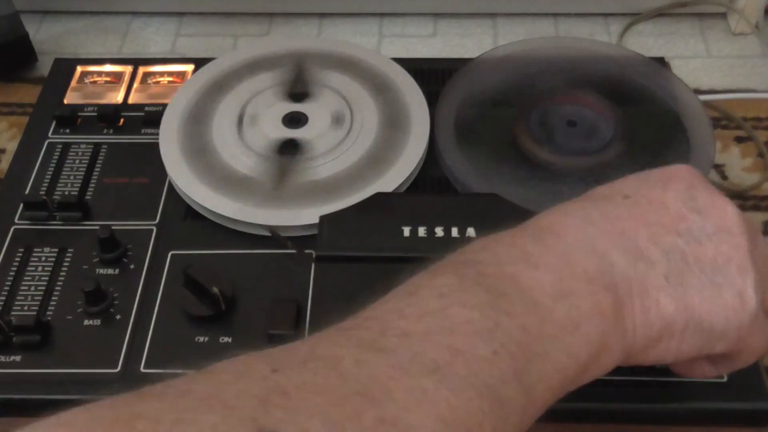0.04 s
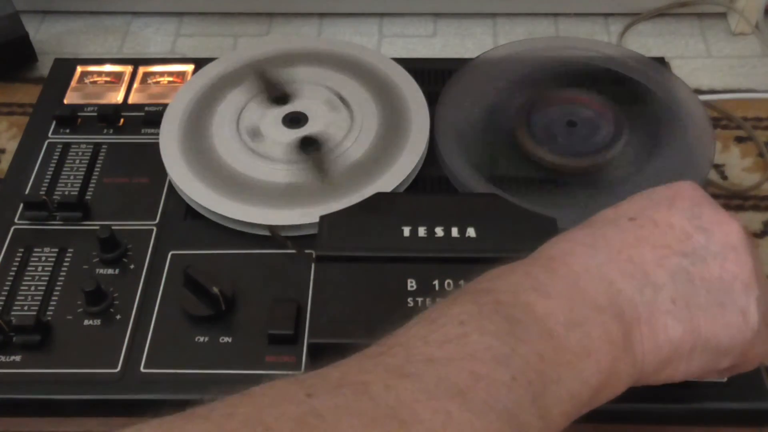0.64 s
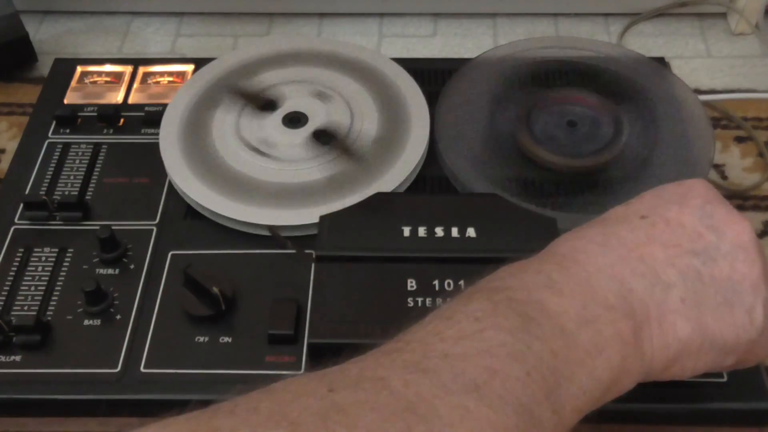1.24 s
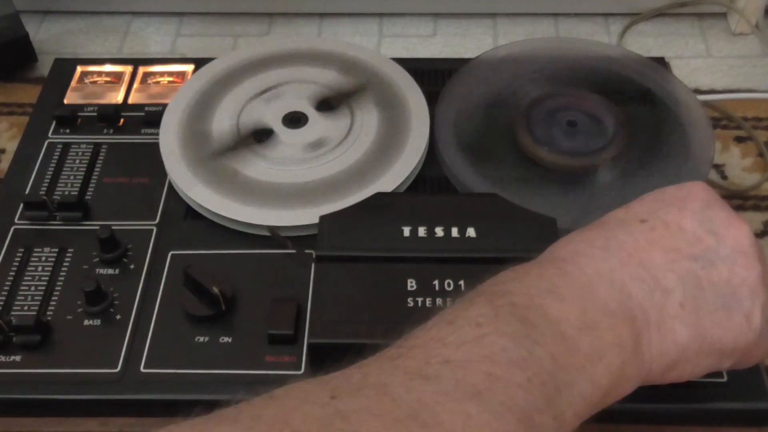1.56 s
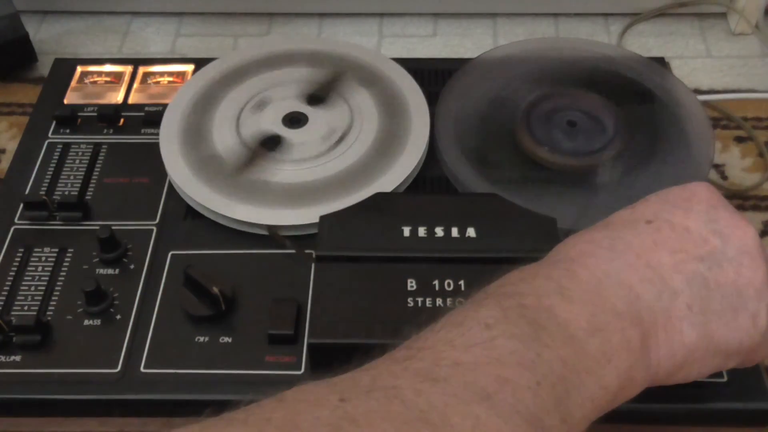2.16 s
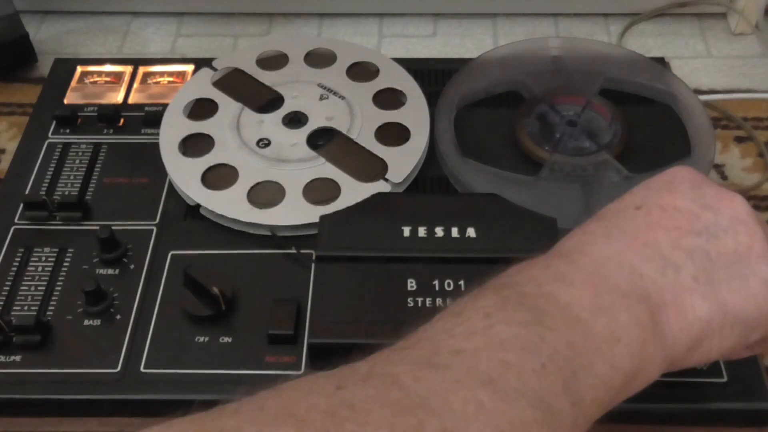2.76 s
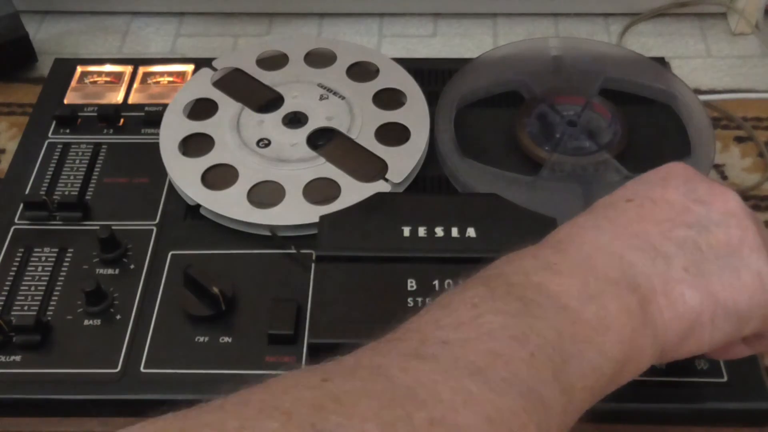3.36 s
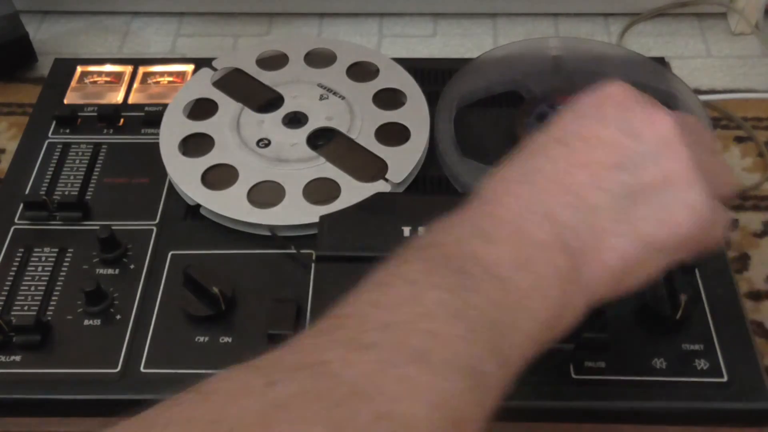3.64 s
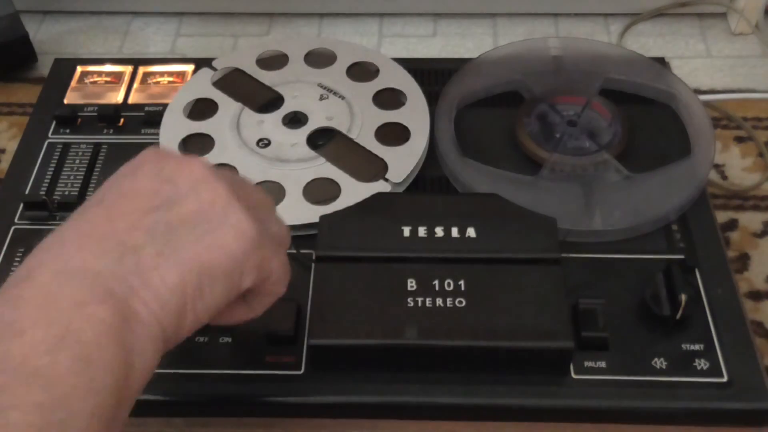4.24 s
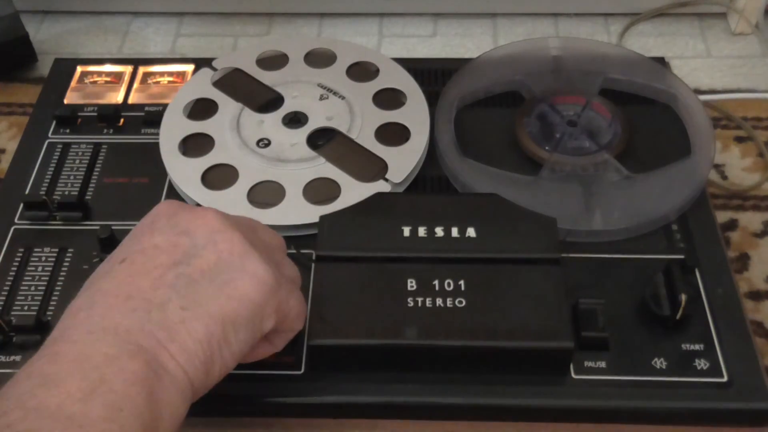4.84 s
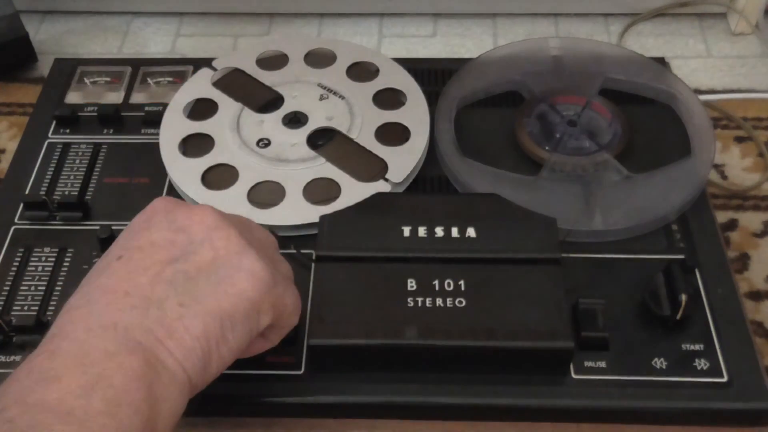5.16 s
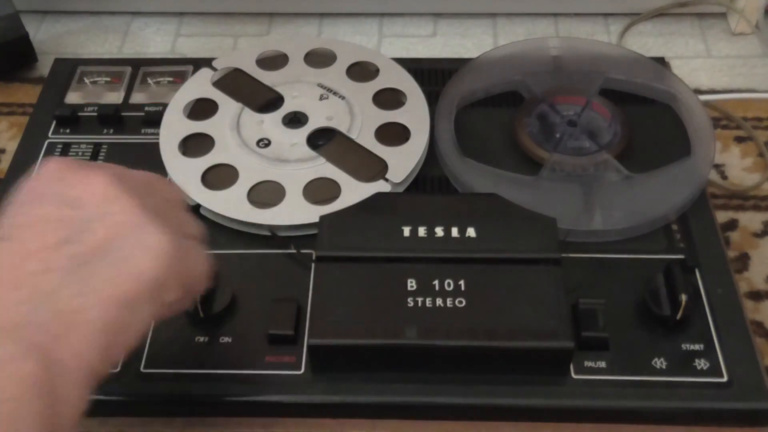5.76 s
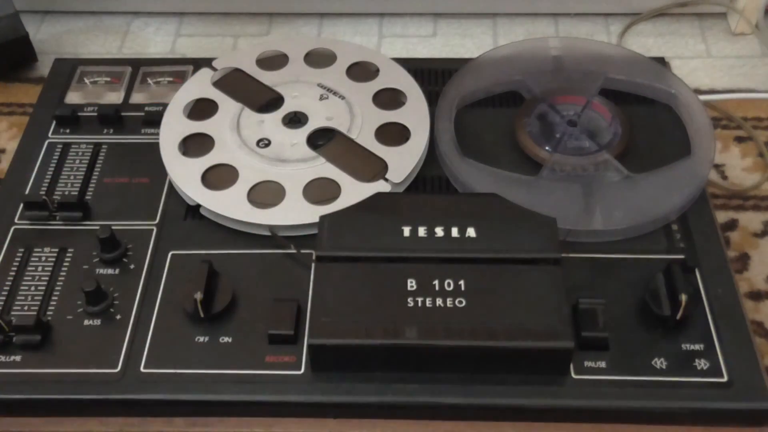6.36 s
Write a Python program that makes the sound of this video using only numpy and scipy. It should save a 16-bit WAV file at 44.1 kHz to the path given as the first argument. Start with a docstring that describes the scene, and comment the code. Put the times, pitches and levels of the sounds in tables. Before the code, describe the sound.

A reel-to-reel tape recorder winds fast with a whirr and ticks, clunks to a stop, idles, then switches off with a ringing clack.

```python
"""A reel-to-reel tape deck winds fast in a small room: the drive whirrs and the tape brushes a reel
flange on every turn. The transport knob snaps to stop, the case rings and the brakes grab. The motor
idles, its belt joint ticking once a lap, while a sleeve rustles and fingers rock the mains switch.
The switch clacks off, its spring rings on and the motor coasts down."""
import sys
import numpy as np
from scipy import signal
from scipy.fft import rfft, irfft, next_fast_len
from scipy.io import wavfile
from scipy.ndimage import uniform_filter1d, map_coordinates

SR = 44100
rng = np.random.default_rng(int(sys.argv[2]) if len(sys.argv) > 2 else 0)


def transcribe(signal):
    """Save signal, clipped to [-1, 1], as a 16-bit WAV file at the path in sys.argv[1]."""
    frames = np.atleast_2d(signal).T
    limited = np.clip(frames, -1, 1)
    pcm = np.round(limited * 32767).astype(np.int16)
    wavfile.write(sys.argv[1], SR, pcm)


N = 286650

STOP_S, OFF_S = 2.362, 4.983  # the transport stops; the power goes
LOADED_LAPS_PER_S, FREE_LAPS_PER_S, SHAFT_TURNS_PER_LAP = 2.9346, 3.21, 7.34

# Tone colours of the steady and rubbing noises. Each row: frequency in Hz, relative level in dB.
DRIVE_WHIRR = [(47, -42), (80, -15.5), (102, -8.5), (151, -12.5), (179, -6.5), (247, -4), (331, -9.5),
               (479, 1), (586, -1), (705, -8), (975, -5), (1170, -6), (2140, -9), (2830, -22.5),
               (3200, -12), (4160, -32.5), (7040, -120)]
TAPE_HISS = [(1500, -33), (3000, -10.5), (3600, -4), (5000, 0), (6200, 2), (7500, -1), (10000, -3),
             (12500, -7), (14500, 1.5), (15800, -4)]
FLANGE_SQUEAK = [(3000, -46), (5000, -14.5), (6200, 5.5), (7600, -15.5), (9000, -4.5), (10200, 4.5),
                 (12000, -11), (13500, -7.5), (15800, -5.5)]
MOTOR_RUMBLE = [(41, -40.5), (70, -17), (101, -3), (268, -2.5), (313, -15), (505, 3), (562, -8.5), (656, 3),
                (720, -13.5), (790, -1), (853, -19.5), (1030, -14.5), (1790, -18.5), (1930, -17.5),
                (2800, -27), (3640, -55.5), (6160, -120)]
BEARING_HISS = [(2500, -19.5), (3600, -6), (4700, 1.5), (5300, -3), (5800, -1), (6800, -13), (9000, -6.5),
                (11000, -20), (15800, -16.5)]
ROOM_TONE = [(15, -52.5), (25, -23.5), (107, -2.5), (174, -6), (269, -2), (333, -3.5), (500, -2),
             (1120, -8), (1730, -11), (2730, -19), (3880, -20), (4820, -16.5), (6310, -22), (13400, -24.5),
             (15800, -28)]
BRAKE_RUB = [(59, -55.5), (100, -27), (265, -3.5), (388, -16), (479, 1.5), (522, -3.5), (868, -4.5),
             (1140, -13.5), (1380, -9.5), (2900, -26.5), (4930, -25), (14500, -36), (15800, -38)]
CLOTH_RUSTLE = [(500, 1), (2000, 2), (3000, -6), (5500, 3), (8000, -2.5), (10000, -12), (15800, -26)]
# Tone colours of the hits. Each row: frequency in Hz, relative level in dB.
SLAP_EDGE = [(500, -12), (1000, -4), (1300, -2), (1850, -5), (2600, -20), (8000, -37)]
SOFT_KNOCK = [(100, -31), (250, 0), (500, 3.5), (750, 1.5), (950, -9.5), (1400, -17), (2800, -35)]
STOP_CRACK = [(400, -5), (1000, -10), (1800, -2.5), (3000, -11.5), (4000, -4.5), (4900, -1), (6200, -5),
              (7200, -2), (10000, -6.5), (12000, -10.5), (14500, -9), (15800, -18)]
CHASSIS_THUD = [(50, -31.5), (150, -19), (245, 3.5), (400, 1.5), (800, -5), (1800, -9), (2800, -14),
                (9000, -40.5)]
SWITCH_CRACK = [(400, -7), (1200, -0.5), (2200, -3.5), (3100, -14.5), (4000, -6), (6000, -5), (8000, -5),
                (9500, -2.5), (11500, -17.5), (13000, -7.5), (15800, -21)]
# Resonances the running parts keep excited. Each row: centre in Hz, width in Hz, relative level in dB.
WINDING_PEAKS = [(172, 60, -8), (265, 38, -4), (502, 54, -6), (595, 28, 3), (645, 12, -0.5), (1057, 34, -8),
                 (2185, 37, -8)]
IDLE_PEAKS = [(255, 12, 0.5), (500, 26, 4), (639, 44, -6), (801, 21, 2), (1063, 30, -13.5), (1215, 23, -13)]
BEARING_PEAKS = [(4550, 350, 0), (5000, 350, -1), (5750, 300, -4)]
# Tape hiss over one reel turn. Each row: share of the turn since the brush, level change in dB.
HISS_OVER_TURN = [(0, 1.5), (.15, 0.5), (.36, -3), (.42, 6.5), (.55, -0.5), (.62, 2.5), (.78, -2.5),
                  (1, 0.5)]
# How hard the tape presses on the flange. Each row: time in seconds, level in dB.
FLANGE_PRESSURE = [(.09, -39), (.58, -32.3), (.85, -34.6), (1.4, -33.6), (1.85, -33.6), (2.31, -36.5)]
# Parts that ring when struck. Each row: pitch in Hz, relative level in dB, 60 dB decay in seconds.
TAUT_BELT_MODES, SLACK_BELT_MODES = [(845, -2, .06)], [(1220, -8, .06)]
FEET_MODES = [(55, -50, .06), (115, -42, .05)]
SWITCH_KNOB_MODES = [(430, -11, .06), (561.5, 0, .05), (773, -5.5, 0.056)]
SWITCH_LEVER_MODES = [(5900, -8.5, .015), (9400, -4.5, .025)]
SWITCH_SPRING_MODES = [(441, -49.5, 1.2), (1066, -56, .9), (2762, -59.5, 1.35), (3348, -65, 1),
                       (3946, -59, .95), (4500, -57, .85), (4667, -54.5, .95)]
# The ring of the case. Each row: pitch in Hz, 60 dB decay in seconds, relative level in dB when hit
# by the transport knob, and when hit by the mains switch.
CASE_MODES = [(242.7, 0.2, -26, -31.5), (355, 0.26, -27, -39.5), (425, .2, -37, -34),
              (471, 0.2, -23, -27.5), (484, 0.23, -31, -38.5), (560, .2, -30, -28.5),
              (598, 0.19, -33, -26.5), (668, 0.23, -31, -31), (745, 0.15, -23.5, -32),
              (789, 0.13, -21.5, -30.5), (847, .2, -25.5, -38.5), (1055, 0.2, -38, -29),
              (1123, .2, -35, -37), (1170, 0.056, -40, -15.5), (1188, 0.19, -33, -27),
              (1246, 0.15, -28.5, -32), (1417, 0.09, -23, -26), (1715, 0.17, -31, -43),
              (1798, 0.15, -29.5, -32), (2131, 0.07, -34, -19.5), (2680, 0.053, -55, -26.5)]
# Hits inside the controls. Each row: start in seconds, relative crack and knock levels in dB.
STOP_CONTACTS = [(2.36, -21, -20), (2.436, -39, -28), (2.453, -46, -31), (2.502, -40.5, -27)]  # the detent lets go, then the brake levers land
SWITCH_CONTACTS = [(4.9745, -20, -31), (4.978, -18.5, -30), (4.9818, -4.5, -16.5), (4.9843, -9, -27),
                   (4.992, -21.5, -21)]
# Strokes of the sleeve. Each row: start and end in seconds, level in dB, rise and fall in seconds.
SLEEVE_STROKES = [(4.125, 4.145, -54, .018, .022), (6.24, 6.5, -63.6, .04, .05)]
# Fingers rocking the mains switch. Each row: start in seconds, relative knock and ping levels in dB.
FINGER_TOUCHES = [(4.5564, -38.5, -57), (4.573, -46, -55), (4.5845, -39.5, -48), (4.592, -43, -45),
                  (4.627, -47, -68), (4.818, -35.5, -56), (4.827, -44, -66), (4.9283, -42, -67),
                  (4.961, -43, -63), (4.975, -40, -24)]
# Stereo image of the deck and of the room tone. Each row: frequency in Hz, left-right correlation.
DECK_IMAGE = [(100, 0.45), (250, 0.92), (550, 0.91), (1000, 0.81), (2000, 0.99), (6000, 0.78), (10000, 0.6),
              (15000, 0.52)]
ROOM_IMAGE = [(60, .05), (180, -0.22), (1000, -0.36), (2000, 0.13), (5000, .2), (15000, 0.22)]
# The room's tail. Each row: frequency in Hz, 60 dB decay in seconds.
ROOM_DECAY = [(150, 0.6), (500, 0.22), (2000, 0.25), (7000, 0.23), (10000, 0.17), (14000, 0.13)]


def amp(db):
    """Decibels to gain."""
    return 10 ** (np.asarray(db) / 20)


def clock():
    """Time of every sample in seconds."""
    return np.arange(N) / SR


def along(points, hz):
    """Read a curve of (Hz, value) points on a log frequency axis."""
    knots, values = np.transpose(points)
    return np.interp(np.log(hz + 1), np.log(knots + 1), values)


def wobble(rate):
    """A smooth random curve, rate knots a second."""
    return map_coordinates(rng.standard_normal(int(N * rate / SR) + 4), [clock() * rate])


def swell(start, end, db, rise, fall):
    """An envelope that grows up to start, holds until end and dies away; times in seconds."""
    t = clock()
    return amp(db) * np.exp(np.minimum(t - start, 0) / rise - np.maximum(t - end, 0) / fall)


def filtered(x, response):
    """EQ a sound with a gain given as a function of frequency."""
    size = x.shape[-1]
    padded = next_fast_len(size + 8192)
    return irfft(rfft(x, padded) * response(np.fft.rfftfreq(padded, 1 / SR)), padded)[..., :size]


def colour(spectrum):
    """EQ curve of a tone colour, rolling off below its first point."""
    return lambda hz: amp(along(spectrum, hz)) * np.minimum(hz / spectrum[0][0], 1) ** 2


def resonances(peaks):
    """EQ curve of a few damped resonances."""
    return lambda hz: sum((-1) ** k * amp(db) * 1j * hz * width / (centre**2 - hz**2 + 1j * hz * width)
                          for k, (centre, width, db) in enumerate(peaks))


def noise(response, image=DECK_IMAGE, size=N):
    """Coloured stereo noise of rms 1, partly alike in both ears."""
    def mid_side(hz):
        angle = np.arccos(np.clip(along(image, hz), -1, 1)) / 2
        return response(hz) * np.array([np.cos(angle), np.sin(angle)])
    mid, side = filtered(rng.standard_normal((2, size)), mid_side)
    stereo = np.array([mid + side, mid - side])
    return stereo / np.sqrt(np.mean(stereo ** 2) + 1e-20)


def add(track, s, sound):
    """Mix a sound into the track at s seconds."""
    part = track[:, round(s * SR):][:, :sound.shape[-1]]
    part += sound[..., :part.shape[1]]


def burst(spectrum, t60, attack, image=DECK_IMAGE):
    """A noisy hit: the contact stirs many close, quickly dying modes."""
    t = np.arange(SR // 4) / SR
    return noise(colour(spectrum), image, size=len(t)) * amp(-60 * t / t60) * (1 - np.exp(-t / attack))


def ring(modes, attack, size=SR // 2):
    """A pitched hit: separate modes, struck at slightly new strengths each time."""
    t = np.arange(size) / SR
    tones = sum((-1) ** k * amp(db + rng.normal() - 60 * t / t60) * np.sin(2 * np.pi * hz * t)
                for k, (hz, db, t60) in enumerate(modes))
    return tones * (1 - np.exp(-t / attack))


def winding():
    """The drive whirrs; the sliding tape hisses and brushes the flange on each reel turn."""
    t = clock()
    fade = np.clip(1 - (t - STOP_S) / 0.31, 0, 1)
    whirr = amp(-52.5) * noise(colour(DRIVE_WHIRR))
    whirr += amp(-56.5 + 1.9 * wobble(25)) * noise(resonances(WINDING_PEAKS))
    first_brush_s, turn_s, quicken_s = .0895, .2488, .0004  # each turn is a little shorter
    k = np.arange(-1, STOP_S / turn_s + 1)
    brush_times = first_brush_s + turn_s * k - quicken_s * k ** 2 / 2
    turns = np.interp(t, brush_times, k)
    turn_db = np.interp(turns % 1, *np.transpose(HISS_OVER_TURN))
    hiss = amp(-50 + turn_db + 1.15 * wobble(90)) * noise(colour(TAPE_HISS))
    # the edge presses in gradually, squeaks in the flange, then slips free with a broad rasp
    brushes = [(s, np.interp(s, *np.transpose(FLANGE_PRESSURE))) for s in brush_times if 0 < s < STOP_S]
    press = sum(amp(db) * np.exp(np.minimum((t - s) / .015, (s - t) / .005)) for s, db in brushes)
    slip = sum(amp(db) * np.exp(-((t - s) / .0055) ** 2) for s, db in brushes)
    squeak = press * amp(1 + 1.2 * wobble(350)) * noise(colour(FLANGE_SQUEAK))
    rasp = slip * amp(-3) * noise(colour([(5000, -13.5), (9000, -4.5), (15000, -1.5)]))
    lean_left = amp([[.7], [-.7]])
    return fade * (whirr * amp(0.89 * wobble(40)) + hiss) + (squeak + rasp) * lean_left


def belt_laps(spin_up_s=.325, coast_s=6.0):
    """Laps run by the belt: slow under load, faster when free, slowing once the power is off."""
    t = clock()
    rate = np.interp(t, [STOP_S, STOP_S + spin_up_s], [LOADED_LAPS_PER_S, FREE_LAPS_PER_S])
    rate *= np.exp(-np.maximum(t - OFF_S, 0) / coast_s)
    return np.cumsum(rate) / SR - .2587  # the joint starts this share of a lap before the pulley


def running_db(db, drop_db, fade_db_per_s):
    """Level of a motor part: steady under power, then a drop and a slow fade."""
    coasting_s = np.maximum(clock() - OFF_S, 0)
    return db - drop_db * (1 - np.exp(-coasting_s / .06)) - fade_db_per_s * coasting_s


def motor():
    """Rumble in the case, mains hum, and a bearing that hisses and rubs once per shaft turn."""
    t = clock()
    shaft_pulse = np.cos(2 * np.pi * SHAFT_TURNS_PER_LAP * belt_laps())
    shade_db = 2.4 * np.exp(-((t - 3.76) / .26) ** 2)  # an arm passes over the deck and shades it
    rumble = amp(-4.5) * noise(colour(MOTOR_RUMBLE)) + amp(-8.5) * noise(resonances(IDLE_PEAKS))
    rumble_db = running_db(-54.9, drop_db=3, fade_db_per_s=4) - .6 * shade_db + shaft_pulse
    hiss = amp(-3.3 + 2.5 * shaft_pulse) * noise(colour(BEARING_HISS))
    rub = amp(-10.5 + 7 * shaft_pulse) * noise(lambda hz: resonances(BEARING_PEAKS)(hz) ** 2)
    bearing_db = running_db(-62.8, drop_db=4, fade_db_per_s=12) - shade_db + 1.5 * wobble(60)
    power = np.clip((OFF_S - t) / .03, 0, 1)
    hum = amp(-71 + wobble(2.3)) * np.sin(2 * np.pi * 100 * t) * power
    return amp(rumble_db) * rumble + amp(bearing_db) * (hiss + rub) + hum


def room_tone():
    """The still air of the room: a soft, wide bed under everything."""
    return amp(-57) * noise(colour(ROOM_TONE), ROOM_IMAGE)


def belt():
    """Once a lap the joint slaps the pulley: a short ringing edge, then a soft knock in the case."""
    out = np.zeros((2, N))
    laps = belt_laps()
    for s in np.interp(np.arange(laps[-1]), laps, clock()):
        db = -41.6 - 1.3 * (s > OFF_S) + .4 * rng.normal()  # a little softer without power
        modes = TAUT_BELT_MODES if s < STOP_S else SLACK_BELT_MODES
        add(out, s - .004, amp(db - 9) * burst(SLAP_EDGE, t60=.059, attack=.0011))
        add(out, s - .002, amp(db) * ring(modes, attack=.002))
        add(out, s, amp(db - 7.5) * burst(SOFT_KNOCK, t60=.15, attack=.0013))
    return out


def chatter(s, crack_db, knock_db, count, first_gap_s=.0033, gap_growth=1.6):
    """Contact rows for a blow and the rebounds of its linkage, ever weaker and further apart."""
    k = np.arange(count)
    delays = np.cumsum(np.r_[0, first_gap_s * gap_growth ** k[:-1]])
    return list(zip(s + delays, crack_db - 4.2 * k, knock_db - 1.7 * k))


def clunk(contacts, crack, crack_t60, thud_db, wet_db):
    """A sprung control snaps over: each contact cracks, thuds into the chassis and stirs the room."""
    out = np.zeros((2, N))
    narrow = [(1000, 0.8), (5000, 1.0), (9000, 0.78)]
    for s, crack_db, knock_db in contacts:
        add(out, s, amp(crack_db + 4) * burst(crack, crack_t60, attack=.001, image=narrow))
        add(out, s, amp(knock_db + thud_db) * burst(CHASSIS_THUD, t60=.07, attack=.0017, image=narrow))
        add(out, s, amp(crack_db + wet_db) * room_tail(crack))
        add(out, s, amp(knock_db - 18) * room_tail(CHASSIS_THUD))
    return out


def room_tail(spectrum, width=0.46):
    """The walls' diffuse answer to a blow of this colour; the treble dies first."""
    correlation = (1 - width ** 2) / (1 + width ** 2)
    wash = noise(colour(spectrum), [(1000, correlation)], size=SR // 2)
    hz, t, bands = signal.stft(wash, SR, nperseg=256)
    decay = amp(-60 * t / along(ROOM_DECAY, hz)[:, None])
    return signal.istft(bands * decay * np.minimum(t / .008, 1), SR, nperseg=256)[1]


def controls():
    """The transport knob, then the mains switch, set the case ringing; the switch spring sings on."""
    knob_hits = STOP_CONTACTS + chatter(2.3635, crack_db=-14, knock_db=-18.5, count=5)
    out = clunk(knob_hits, STOP_CRACK, crack_t60=.026, thud_db=-3, wet_db=-16)
    out += clunk(SWITCH_CONTACTS, SWITCH_CRACK, crack_t60=.021, thud_db=-5, wet_db=-16.5)
    add(out, STOP_S, amp(0.5) * ring([(hz, db, t60) for hz, t60, db, _ in CASE_MODES], attack=.0027))
    add(out, OFF_S, amp(3) * ring([(hz, db, t60) for hz, t60, _, db in CASE_MODES], attack=.00067))
    add(out, OFF_S, amp(1.5) * ring(SWITCH_SPRING_MODES, attack=.001, size=SR))
    # the small case radiates almost no bass, but each blow bumps the whole deck on its feet
    out = signal.sosfilt(signal.butter(2, 130, "highpass", fs=SR, output="sos"), out)
    for s in (STOP_S, OFF_S):
        add(out, s, ring(FEET_MODES, attack=.002))
    return out


def brakes():
    """The pads judder on the reel drums until they stand, then drag faintly."""
    grip = swell(2.45, 2.525, db=-37.3, rise=.04, fall=.031)
    drag = swell(2.6, 2.9, db=-65, rise=.03, fall=.15)
    return (grip + drag) * amp(3 * wobble(110)) * noise(colour(BRAKE_RUB))


def idler():
    """Released from the reel, the idler wheel whirrs on for a moment."""
    whirr = noise(lambda hz: resonances([(1030, 110, 0), (1270, 130, -2)])(hz) ** 2)
    return swell(2.6, 3.03, db=-61, rise=.05, fall=.09) * whirr


def sleeve():
    """Cloth rubs softly as the arm moves."""
    strokes = sum(swell(*stroke) for stroke in SLEEVE_STROKES)
    return strokes * amp(1.2 * wobble(50)) * noise(colour(CLOTH_RUSTLE))


def fingers():
    """Fingers take up the play of the switch: dull knocks, dry ticks and tiny pings of its lever."""
    out = np.zeros((2, N))
    dry_tick = [(800, -2), (2200, 5), (3000, -13.5), (6000, -8), (11000, -25.5)]
    for s, knock_db, ping_db in FINGER_TOUCHES:
        add(out, s, amp(knock_db + 0.5) * ring(SWITCH_KNOB_MODES, attack=.0013))
        add(out, s, amp(knock_db - 5) * burst(SOFT_KNOCK, t60=.087, attack=.001))
        add(out, s, amp(ping_db + 2.5) * burst(dry_tick, t60=.04, attack=.001))
        add(out, s, amp(ping_db - 2) * ring(SWITCH_LEVER_MODES, attack=.0015))
    return out


def whistle(start_s=4.91, start_hz=8620, sag_hz_per_s=3900):
    """A faint, wavering whistle falls in pitch as the switch is turned."""
    flicker = amp(-3 + 3 * wobble(70))
    hz = start_hz - sag_hz_per_s * (clock() - start_s) + 110 * wobble(600)
    tone = np.sin(2 * np.pi * np.cumsum(hz) / SR)
    return swell(start_s, 5.185, db=-66, rise=.022, fall=.02) * flicker * tone


def duck(x, threshold_db, slope, recovery_s):
    """A loud peak turns the gain down; it creeps back afterwards."""
    t = clock()
    excess_db = np.maximum(20 * np.log10(np.abs(x).max(axis=0) + 1e-9) - threshold_db, 0)
    held_db = np.maximum.accumulate(excess_db * np.exp(t / recovery_s)) * np.exp(-t / recovery_s)
    return x * amp(-slope * uniform_filter1d(held_db, size=128))


def scene():
    """The deck, the arm that works it and the still room."""
    deck = winding() + motor() + belt() + controls() + brakes() + idler()
    return deck + fingers() + whistle() + sleeve() + room_tone()


def record(dry):
    """The mix ducks after the loudest snap, its peaks are rounded off and the very top is cut."""
    ceiling, top_hz = .65, 15870
    ducked = duck(dry, threshold_db=-7, slope=0.47, recovery_s=0.44)
    rounded = ducked / (1 + (ducked / ceiling) ** 4) ** .25
    return filtered(rounded, lambda hz: hz < top_hz)


dry = scene()
out = record(dry)
transcribe(out)
```